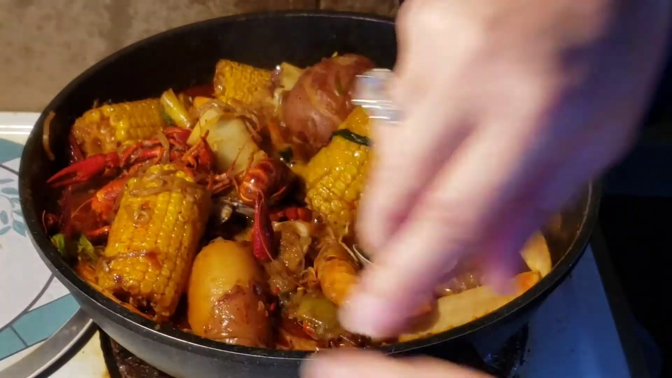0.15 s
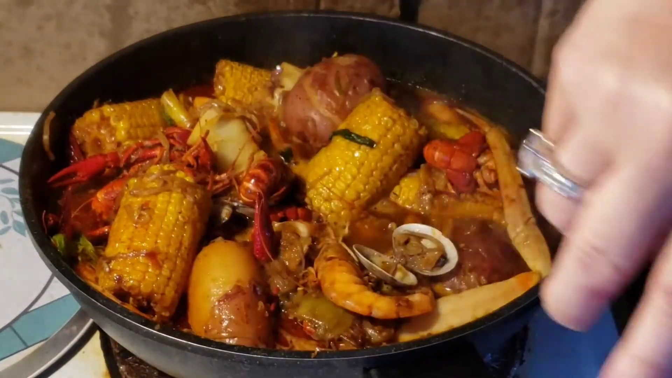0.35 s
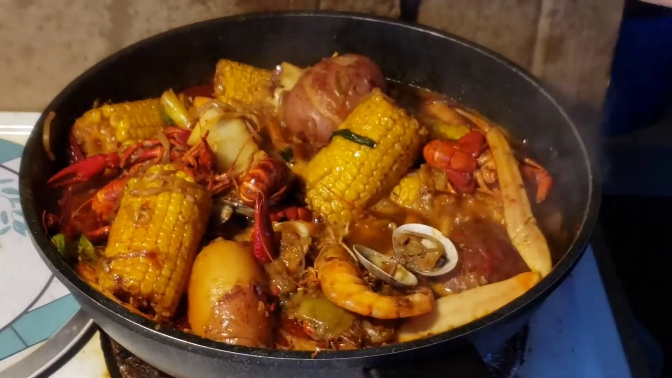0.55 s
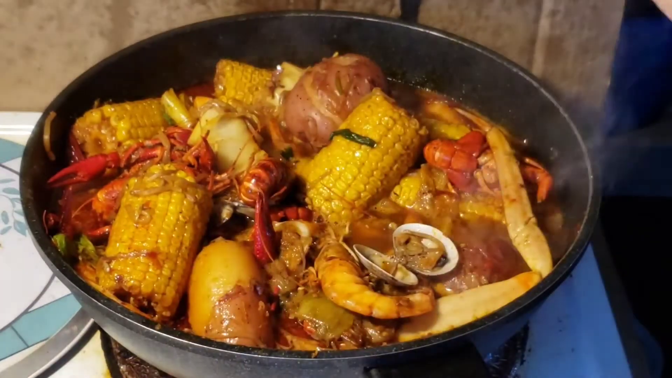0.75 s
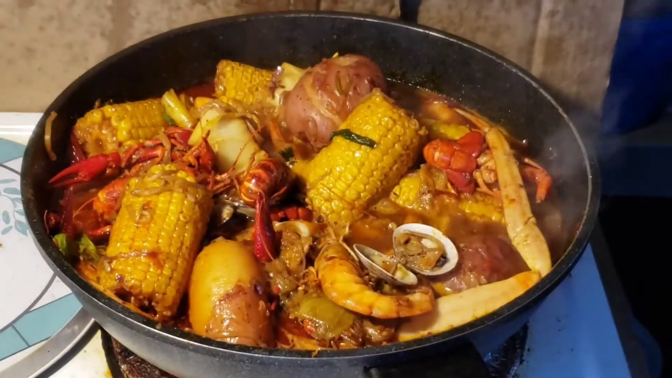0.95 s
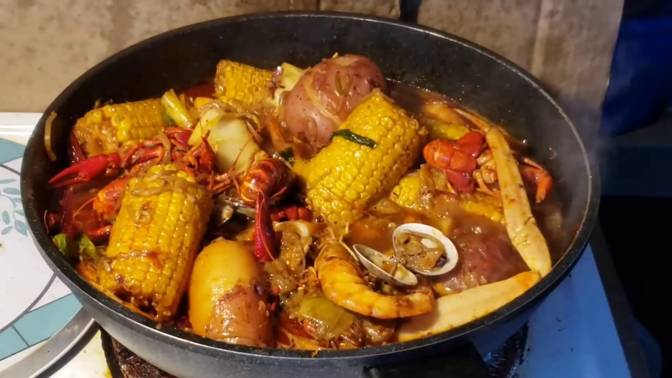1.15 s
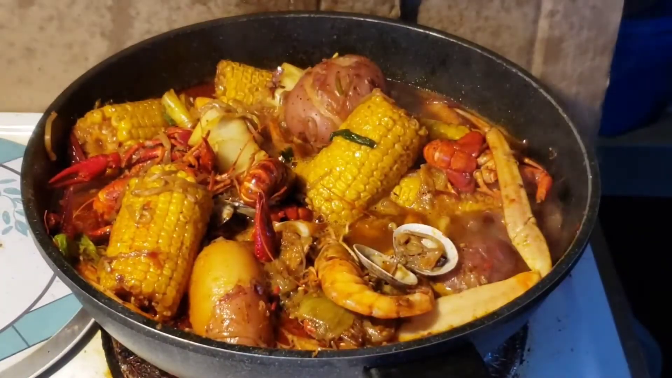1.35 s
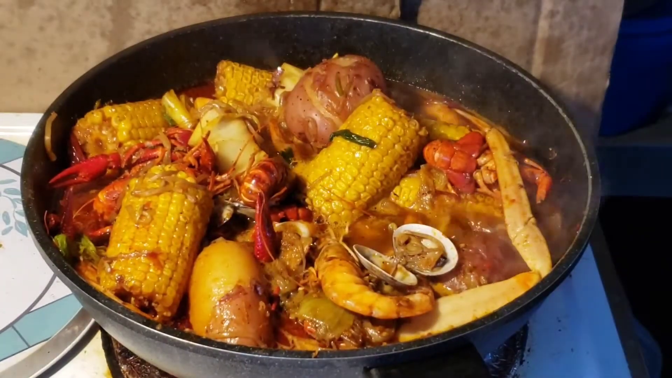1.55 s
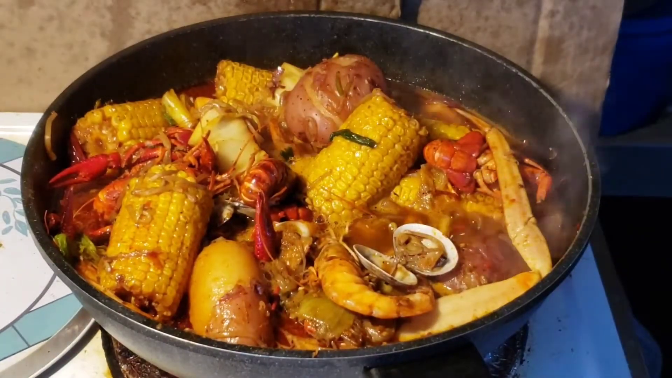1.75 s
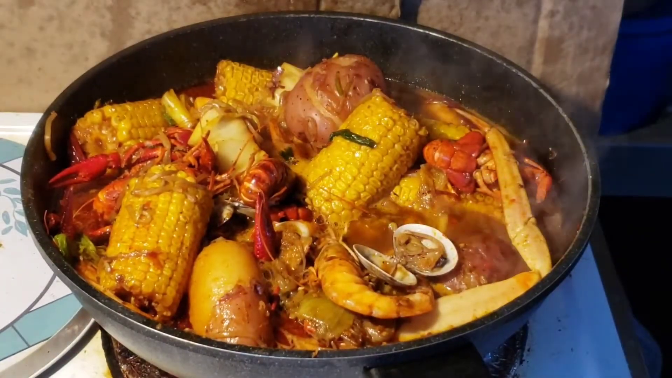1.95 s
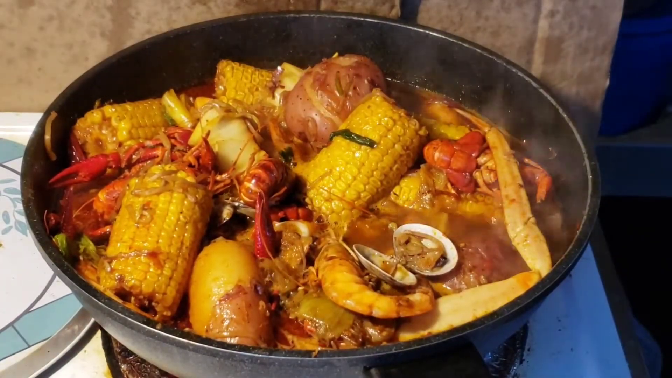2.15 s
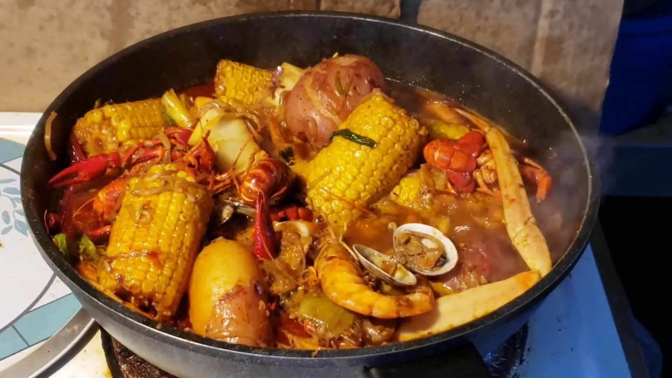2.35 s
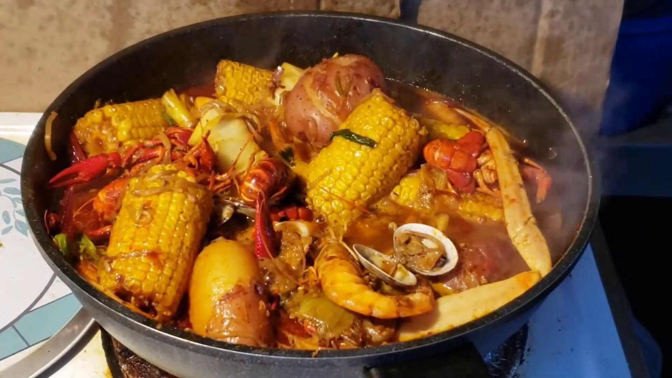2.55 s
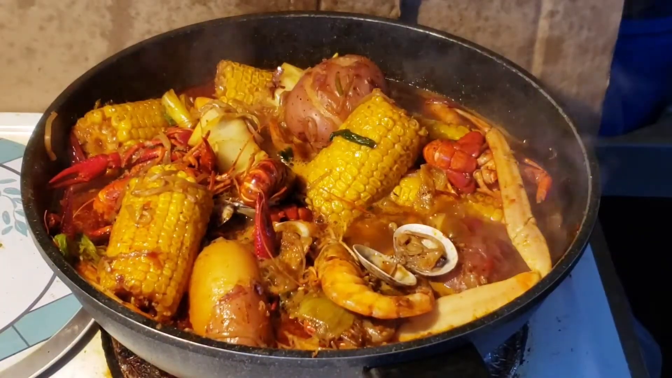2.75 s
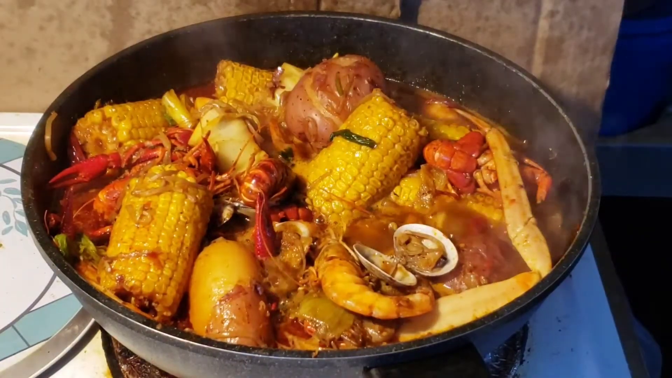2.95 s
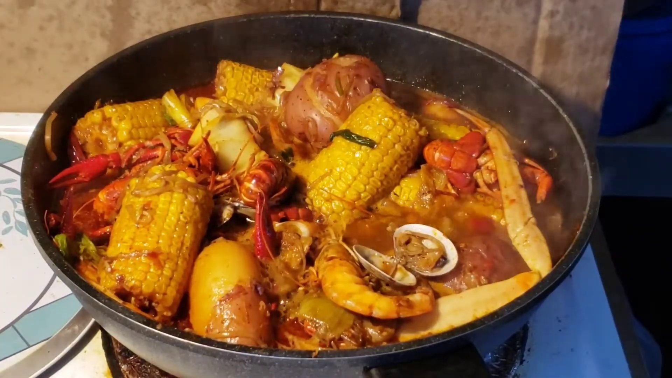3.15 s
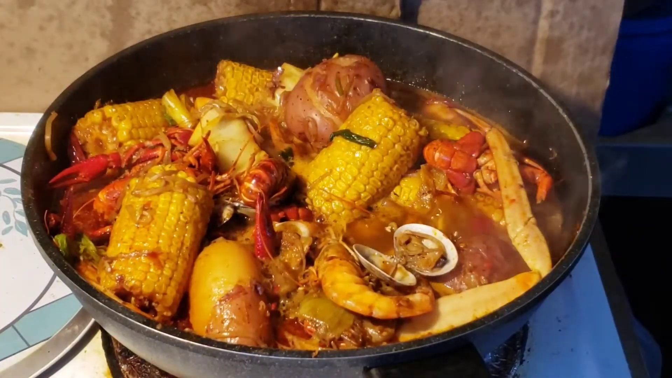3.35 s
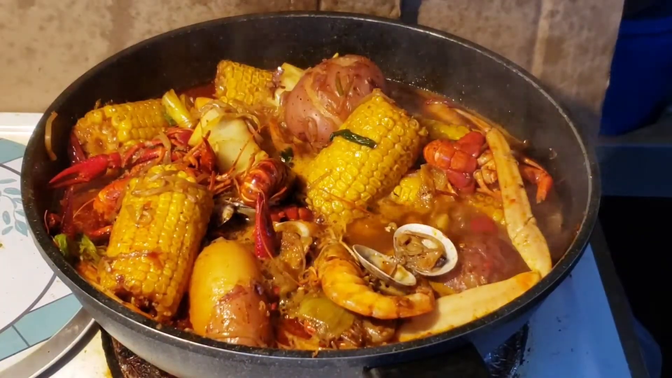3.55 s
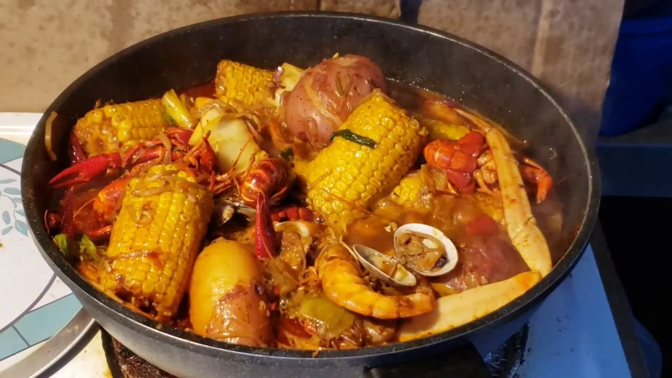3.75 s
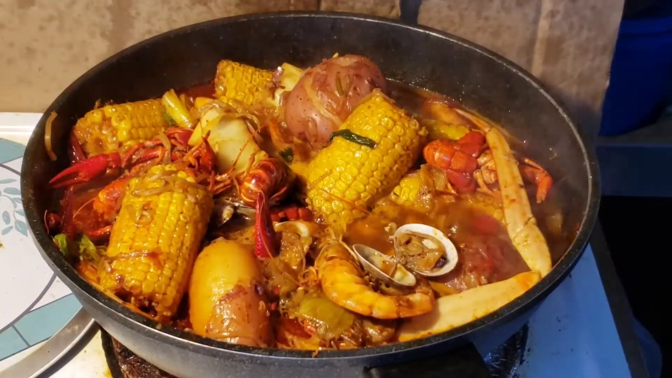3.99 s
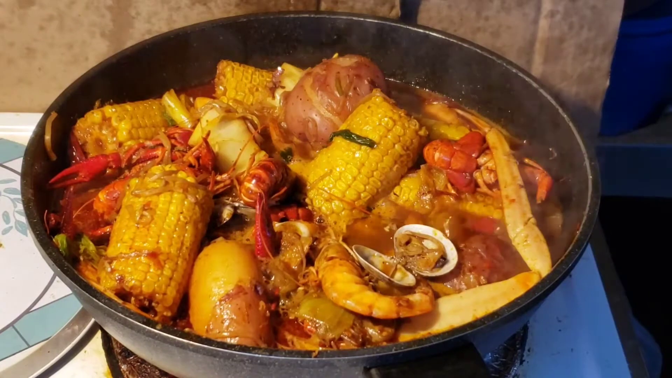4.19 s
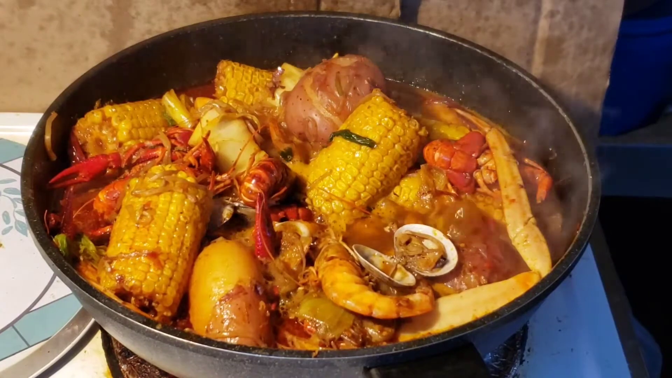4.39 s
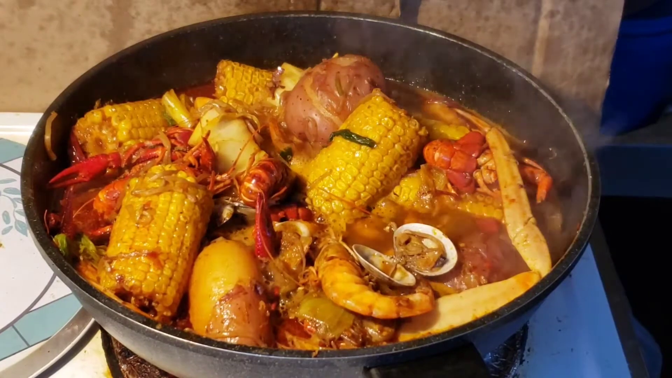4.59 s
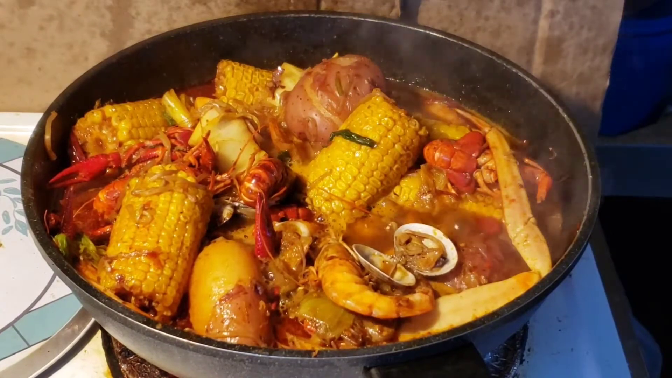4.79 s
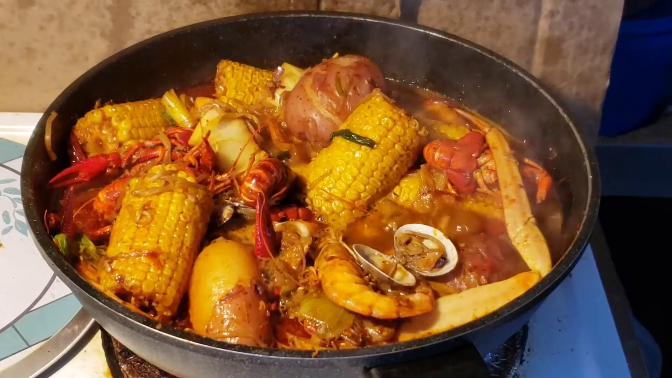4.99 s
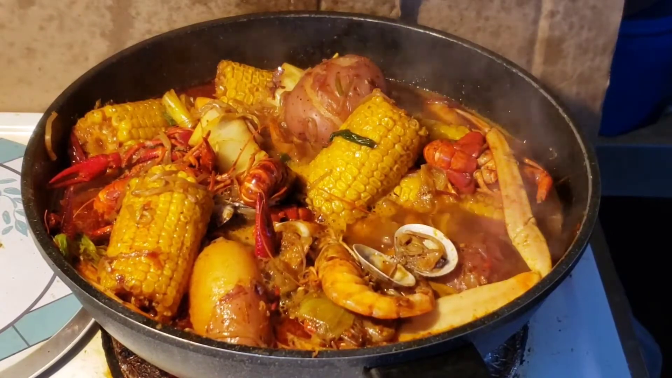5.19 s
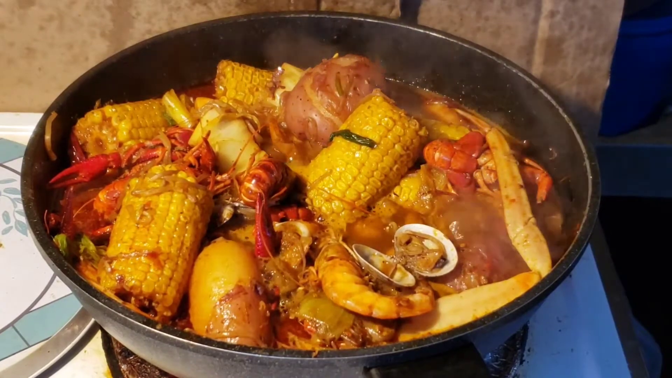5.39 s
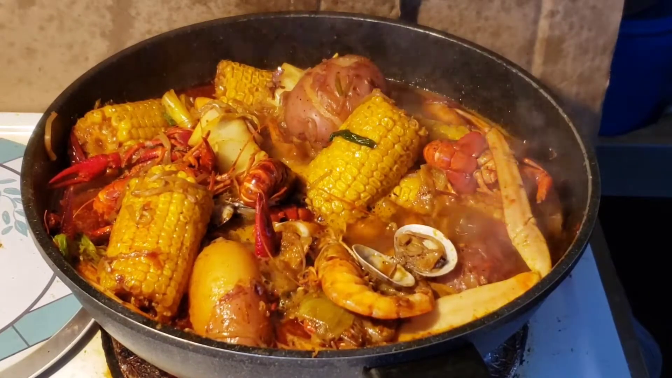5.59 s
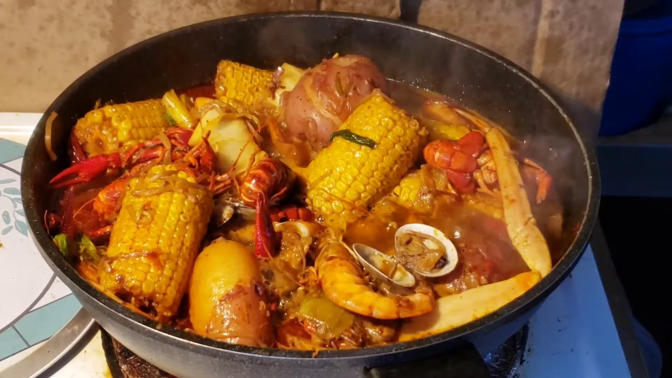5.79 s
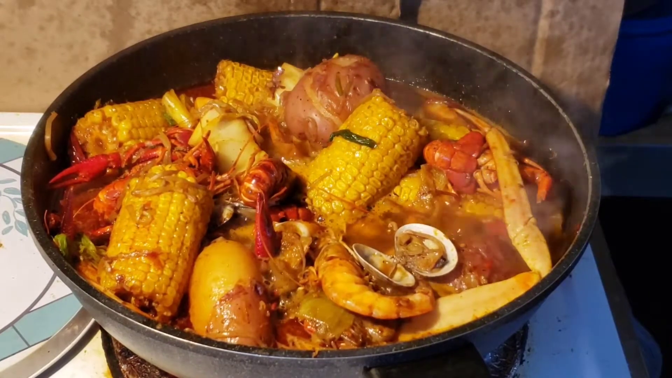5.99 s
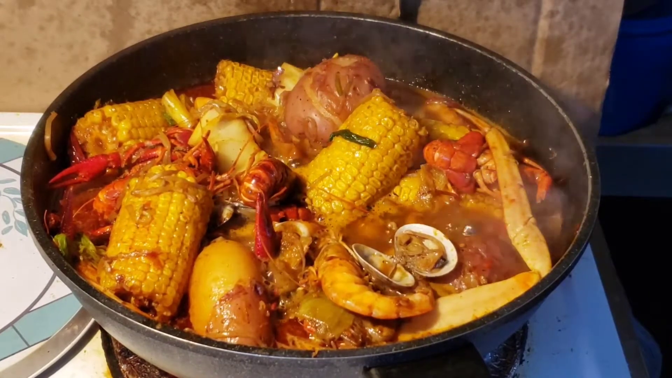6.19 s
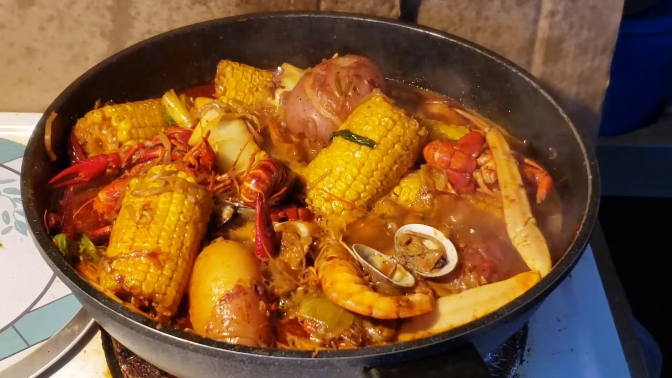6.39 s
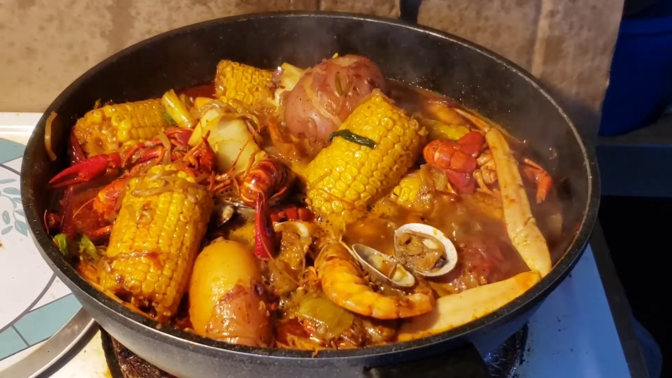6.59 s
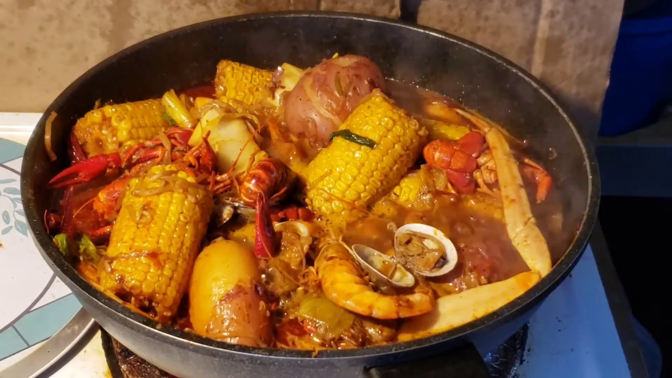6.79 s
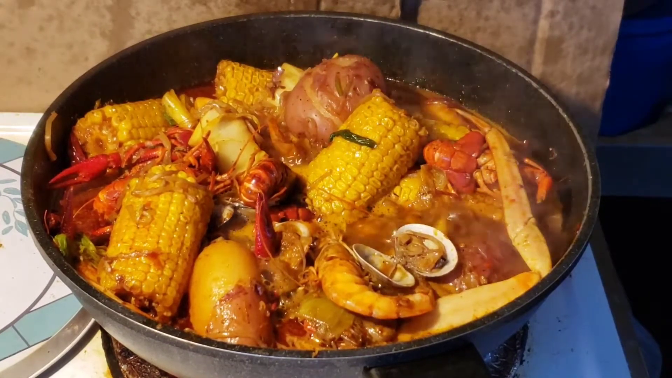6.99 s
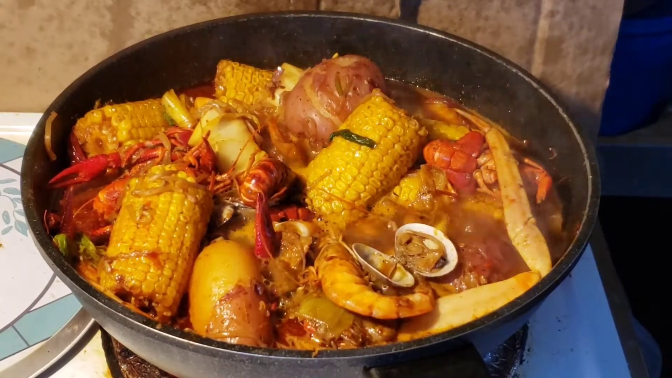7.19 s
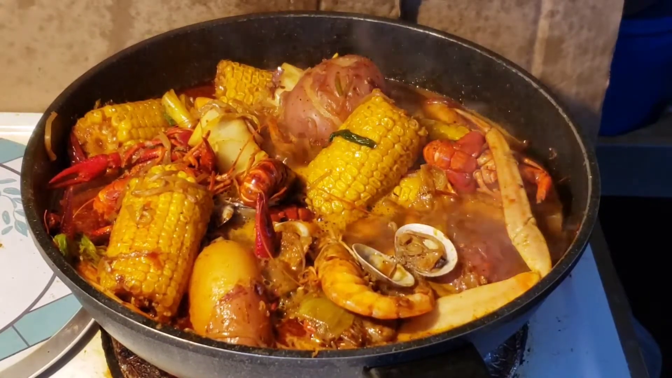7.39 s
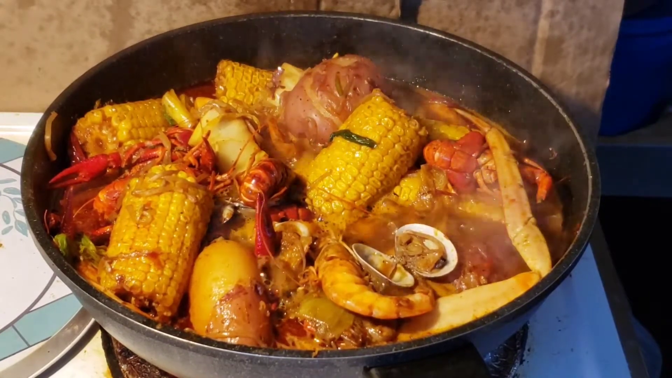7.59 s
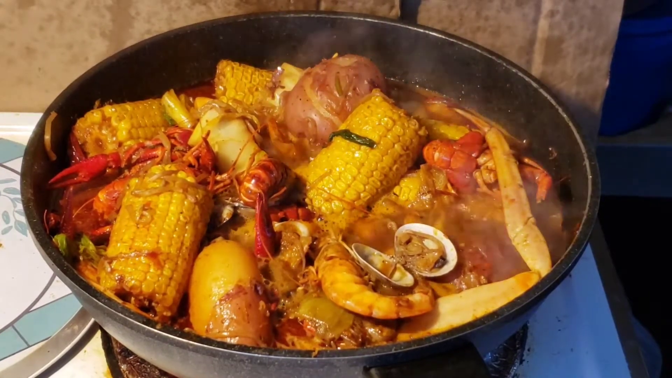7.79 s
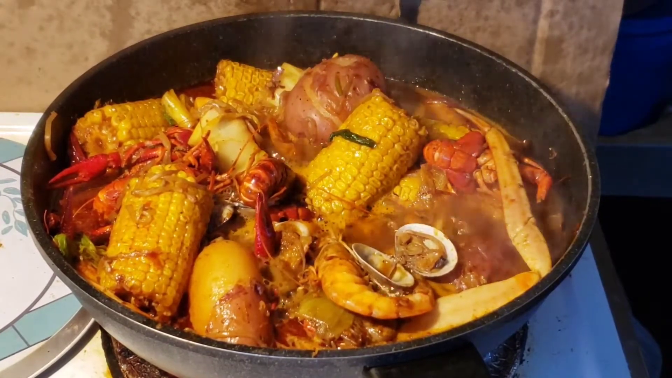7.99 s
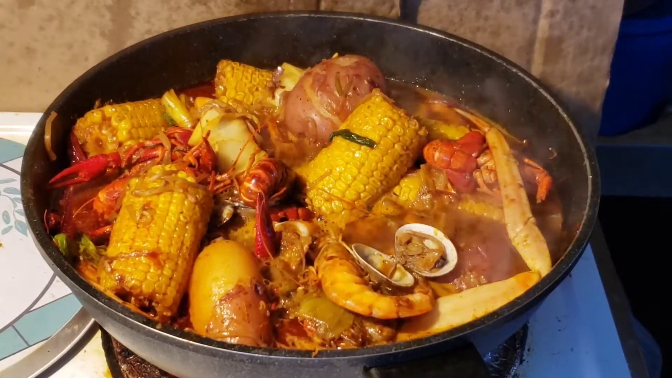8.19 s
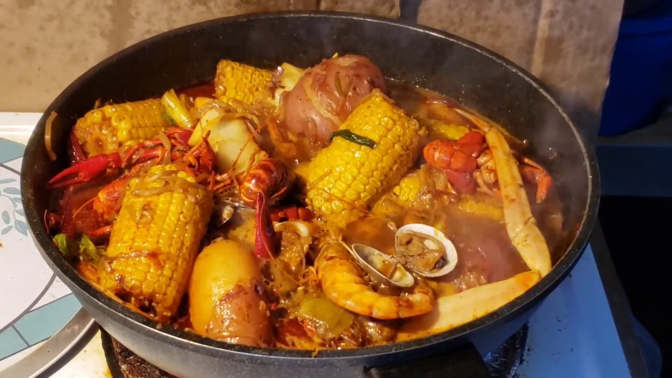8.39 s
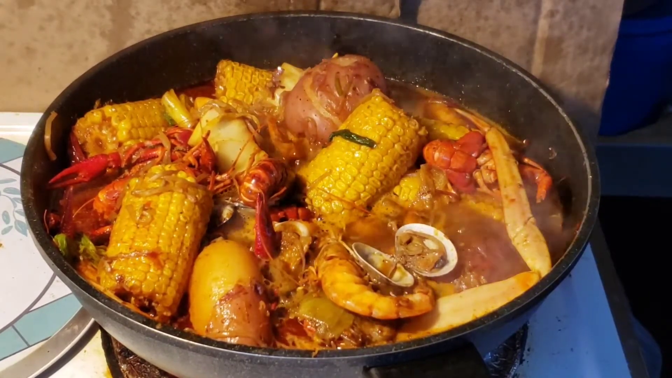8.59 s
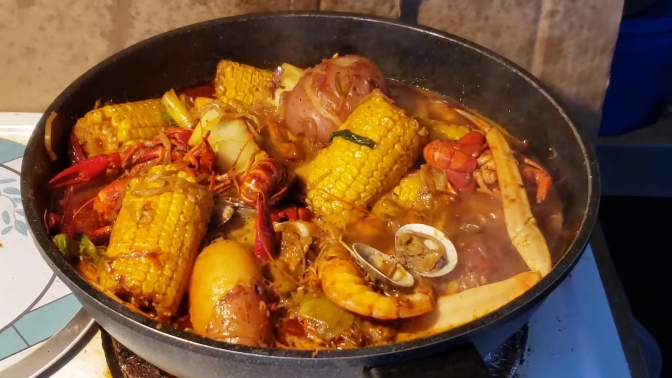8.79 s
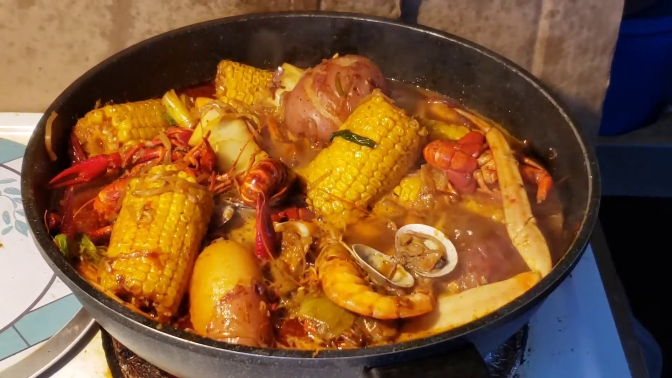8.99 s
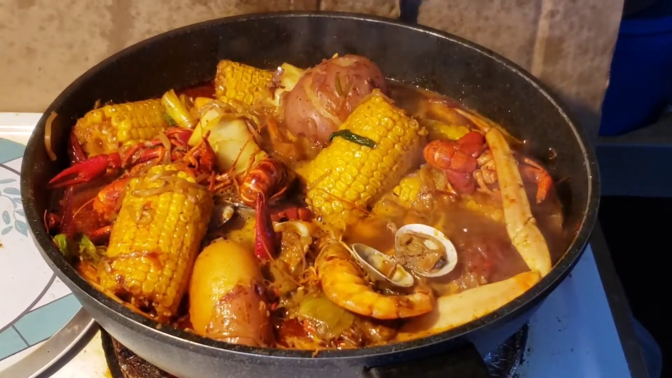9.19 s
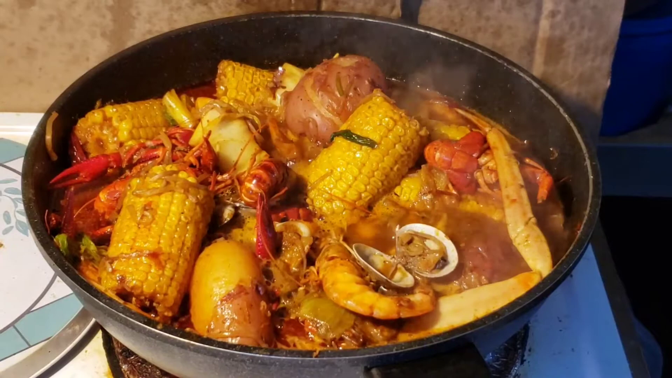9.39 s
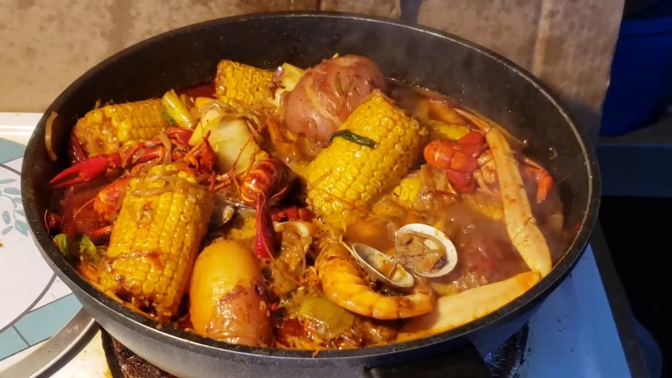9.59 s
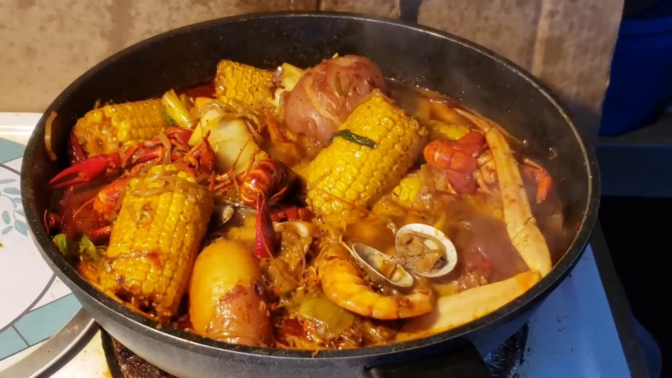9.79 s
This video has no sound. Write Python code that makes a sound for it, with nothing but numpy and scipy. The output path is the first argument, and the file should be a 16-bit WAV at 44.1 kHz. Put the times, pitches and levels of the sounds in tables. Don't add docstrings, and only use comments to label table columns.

```python
import sys
import numpy as np
from scipy import signal
from scipy.fft import rfft, irfft
from scipy.io import wavfile
from scipy.ndimage import uniform_filter1d

SR = 44100
rng = np.random.default_rng(int(sys.argv[2]) if len(sys.argv) > 2 else 0)


def to_wav(sig):
    pcm = np.clip(np.atleast_2d(sig), -1, 1) * 32767
    pcm = np.round(pcm).astype(np.int16)
    wavfile.write(sys.argv[1], SR, pcm.T)


def gain_from_db(level_db):
    decades = np.asarray(level_db, float) / 20
    return 10 ** decades


N = 434385

# time in seconds, gain in dB, vigour in dB.
GAIN_AND_VIGOUR = [(0, -4.5, 6), (.4, -6, 5), (1.07, -5, -1.5), (1.23, -4, 1.5), (1.39, -7, 0),
                   (1.75, -4, 5), (2.33, -3.5, 1.5), (2.91, 0, 3), (3.45, -2, 2), (4.9, -0.5, 5),
                   (6.5, -0.5, 6), (7.96, 0, 7), (8.57, 0.5, 7.5), (9.55, 0, 5.5), (9.85, -0.5, 2.5)]

# frequency in Hz, level in dB per Hz.
AIR_TONE = [(12, -15), (20, -9), (123, -1), (167, -0.5), (352, -3), (431, -13), (700, -17), (823, -6.5),
            (929, -22), (1070, -7), (1210, -16.5), (2500, -48), (3250, -81), (5500, -120)]
# frequency in Hz, likeness (clipped to 0 to 1 after
PORT_LIKENESS = [(60, 0.7), (150, 0.8), (380, 0.88), (950, 0.16), (2380, 0.5), (5980, -0.6), (15000, -12)]
# frequency in Hz, gain in dB.
RIGHT_SHADOW = [(60, -0.5), (200, -3), (380, 1), (700, -2), (1300, -4), (2400, -5.5), (4400, -7),
                (8100, -7.5), (15000, -4.5)]
# frequency in Hz, gain in dB.
MIC_RESPONSE = [(200, -0.5), (2000, 5), (5000, 0), (7300, 0.5), (8600, -8.5), (10500, -4), (13500, -0.5),
                (15500, 3.5)]
MOTOR_HZ, BEAT_S, BEAT_NULL_S = 59.2, 3.75, 3.0
MAINS_HZ, ROTOR_WOBBLE_HZ = 120.5, 5.9

# time in seconds, low shudder in dB, rasp in dB, shudder pitch in Hz.
NUDGE = [(0, -69, -26.5, 275), (.018, -44, -34, 268.5), (.04, -29.5, -35, 265.3), (.07, -38, -35.5, 253),
         (.09, -46.5, -31, 176), (.115, -44, -31, 175), (.135, -45, -33.5, 165), (.15, -57, -27.5, 158),
         (.2, -85, -40.5, 159), (.3, -84, -47.5, 164), (.4, -78, -103, 166)]
# start in seconds, peak in dB, centre in Hz, spray in dB, snap strength.
CATCHES = [
    (0.0524, -27, 5130, -30, .6),
    (.0844, -35, 6780, -42, .6),
    (0.1068, -29, 3580, -23, .6),
    (0.1398, -12, 5400, -4, 0.95),
    (0.2213, -35, 4940, -35, .6),
]
# start in seconds, peak in dB, pitch in Hz, 60 dB decay in seconds, sharpness.
COUNTER_KNOCKS = [
    (1.139, -44.5, 284, 0.026, 5),
    (1.144, -40, 4100, 0.033, 6.0),
    (1.16, -38, 4050, 0.046, 6.5),
    (1.155, -43.5, 2450, .05, 8),
    (1.146, -47, 1950, 0.2, 3.5),
]
# start in seconds, peak in dB, pitch in Hz.
ROCKING_THUDS = [(1.075, -44.5, 76), (2.722, -51, 49.6), (4.42, -43, 185), (5.62, -46, 183),
                 (6.16, -46, 180), (7.68, -44, 177), (7.98, -42, 185), (9.28, -43, 188), (9.62, -45, 190)]

# frequency in Hz, level in dB per Hz.
SIZZLE_TONE = [(900, -48), (1700, -2), (3000, -4), (7000, -3), (9000, -3.5), (12000, -3.5), (16000, -8)]
# crest in seconds, hiss in dB, length in seconds, treble against body in dB.
STEAM_JETS = [(0.28, -59.5, 0.56, -1.5), (1.274, -57.5, 0.48, 0), (1.66, -59, 0.095, 0),
              (1.92, -58.5, 0.12, 1), (2.168, -52.5, 0.065, -7), (2.572, -52, 0.063, -1),
              (3.077, -54, 0.47, 4), (3.637, -55, 0.1, -28), (3.898, -77, 0.32, -20),
              (4.173, -51.5, 0.042, -23), (4.363, -55, 0.053, -16), (4.506, -64, 0.1, -15),
              (4.954, -55.5, 0.14, 1), (5.151, -45, 0.041, -5), (5.23, -53.5, 0.055, 5),
              (5.385, -53, 0.1, 2), (5.67, -48.5, 0.035, -20), (5.9, -53.5, 0.21, -1),
              (6.41, -52, 0.095, -14), (6.693, -53.5, 0.087, -19), (6.812, -52, 0.032, 0),
              (7.14, -50, 0.061, -11), (7.506, -59, 0.77, -17), (7.767, -62, 0.3, -5),
              (8.017, -48, 0.046, -12), (8.387, -51, 0.19, -5), (8.672, -50, 0.11, 2),
              (9.02, -56, 0.25, -21), (9.328, -52.5, 0.097, -29), (9.545, -52.5, 0.35, -5)]
# middle in seconds, depth in dB, length in seconds.
LULLS = [(1.478, 0.5, 0.08), (2.114, 8.5, 0.05), (2.706, 2, 0.15), (3.384, 10.5, 0.13), (4.267, 0.5, .05),
         (5.816, 6.5, .06), (6.3, 2, 0.087), (9.197, 2.5, .04), (9.471, 13, 0.029)]
STEAM_DB, STEAM_FOLLOWS = -61, 0.17
JET_EDGE_DB, JET_RISE = 17, 1
SEEP_TOP_DB, TOP_FLOOR_DB = -0.5, -70

# start in seconds, peak in dB, centre in Hz, spray in dB.
POPS = [(0.538, -42.5, 3600, -43), (2.599, -46, 2620, -65), (3.484, -41.5, 6820, -69),
        (3.95, -34.5, 7560, -50), (4.162, -36, 6030, -65), (4.349, -38.5, 3600, -59),
        (4.4702, -35, 2400, -51), (4.666, -32, 6400, -65), (4.934, -36, 5840, -38),
        (4.964, -38.5, 2770, -41), (5.1128, -39, 6800, -56), (5.1337, -24, 7560, -25.5),
        (5.219, -25.5, 6650, -38), (5.6507, -33, 6140, -36), (5.831, -39, 7700, -46),
        (5.8773, -41, 2390, -54), (6.498, -40.5, 4080, -37.5), (6.696, -34.5, 5670, -62),
        (6.9244, -39, 4040, -50), (7.1356, -31, 4270, -46), (7.149, -24.5, 7000, -34),
        (7.3005, -34.5, 4900, -45), (7.4811, -27.5, 5570, -36), (8.182, -41.5, 4180, -43),
        (8.361, -36, 3060, -42), (8.461, -39, 2500, -38), (8.704, -38, 5200, -37),
        (9.0322, -26.5, 2800, -38), (9.2948, -28.5, 6800, -60), (9.6405, -30.5, 7090, -34)]
# start in seconds, peak in dB, centre in Hz.
SPITS = [(.624, -48, 3980), (2.477, -43, 2690), (3.648, -54, 6800), (3.8202, -44, 3040),
         (3.9205, -46, 2560), (3.9971, -37, 2450), (4.7317, -36.5, 4470), (4.813, -42, 3480),
         (5.039, -37.5, 2900), (5.464, -42, 9000), (5.7025, -34.5, 7900), (5.985, -35.5, 2130),
         (6.6478, -38.5, 5200), (6.9735, -43, 9000), (7.3677, -37.5, 3750), (7.5622, -39, 5310),
         (7.6117, -33.5, 6600), (7.779, -35.5, 5050), (8.0737, -35, 8000), (9.1486, -34, 6940),
         (9.2588, -35.5, 3440), (9.34, -36, 3840), (9.397, -36.5, 3420), (9.4878, -44, 3800),
         (9.5146, -44, 2370)]
# start in seconds, peak in dB, centre in Hz.
FURTHER_SPITS = [(0.3724, -54, 2650), (0.4656, -41, 6840), (0.6875, -54, 2580), (0.711, -45, 5100),
                 (0.7415, -44, 2750), (0.868, -41, 6890), (0.92, -44, 7500), (0.9846, -45.5, 2730),
                 (1.3019, -41, 3840), (1.6511, -43, 3020), (1.9425, -39, 3370), (2.152, -39, 6610),
                 (2.5748, -38, 2750), (2.8689, -34.5, 7400), (4.4505, -54, 2610), (4.5206, -40.5, 3770),
                 (4.8668, -40, 5770), (5.5024, -41, 4260), (5.5695, -38.5, 4670), (6.0631, -41, 2780),
                 (6.2597, -40, 6200), (6.33, -44, 3020), (6.3589, -37, 6810), (6.4233, -35, 4660),
                 (6.6847, -39, 5110), (6.7925, -42, 2580), (6.992, -41, 5870), (7.0764, -49, 6020),
                 (7.107, -45, 2530), (7.9194, -35, 6900), (8.008, -35, 6250), (8.1447, -44, 6850),
                 (8.5959, -45, 4650), (8.6348, -33, 5670), (9.1305, -44, 3800), (9.5357, -33, 3060),
                 (9.5512, -33, 7120), (9.615, -38, 2650), (9.74, -43, 2550)]
TICK_TRIM_DB = -2.5
STRAY_POPS, STRAY_POP_DB, SMALL_SPRAY_DB = 4, -72, -10.5
POP_SNAP, SPIT_SNAP = 1.74, 1.96
POP_T60_S, SPIT_T60_S = 0.067, 0.024
LEAD_DB, LEAD_SPREAD_DB, CATCH_LEAD_DB = 14, 3, 17

# frequency in Hz, width in Hz, gain in dB.
PAN_MODES = [(250, 15, 3.5), (528, 25, 8.5), (847.4, 44, 12), (1069, 83, 8), (1306, 220, 1), (1940, 40, -3)]
# frequency in Hz, level in dB per Hz.
GURGLE_TONE = [(150, -40), (300, 1.5), (520, -2.5), (640, 7.5), (740, -7.5), (1200, -5), (2500, -9.5),
               (5000, -52), (8000, -52)]
# start in seconds, peak in dB, pitch in Hz.
FREE_BUBBLES = [(.606, -45, 1280), (2.398, -40, 1920), (3.125, -38.5, 1420), (3.92, -37, 2240),
                (4.235, -39, 1840), (4.3, -39, 2150), (4.501, -36, 1390), (4.667, -40, 1900),
                (5.008, -43, 640), (5.037, -33, 1890), (5.325, -34.5, 1940), (6.569, -39, 570),
                (8.733, -37, 1130), (8.975, -37, 634), (9.031, -27, 2420), (9.234, -37, 1480),
                (9.334, -36, 1700), (9.381, -37, 1380), (9.525, -39, 1010), (9.598, -29.5, 1920),
                (9.738, -38.5, 1370), (5.078, -38.5, 1070), (5.983, -40.5, 1070), (6.845, -38.5, 1600),
                (7.159, -40.5, 800), (7.486, -38, 1000), (8.999, -34.5, 1200), (9.101, -40, 1070),
                (9.258, -41, 1100), (3.216, -34.5, 556)]
# start in seconds, peak in dB.
WALL_POCKETS = [(.766, -42.5), (1.277, -43), (1.383, -41.5), (1.98, -40), (2.598, -35.5), (3.212, -38),
                (3.825, -38.5), (3.98, -31.5), (4.455, -37), (4.521, -37.5), (4.964, -40), (5.149, -33),
                (5.429, -36.5), (5.613, -39), (5.732, -37), (6.33, -34.5), (6.79, -35.5), (6.898, -32),
                (7.008, -36.5), (7.269, -37), (7.464, -41), (7.98, -40), (8.236, -35), (8.336, -38.5),
                (8.462, -29.5), (8.811, -36), (9.206, -33), (9.28, -38), (9.499, -38.5), (9.834, -37)]
# start in seconds, peak in dB.
DEEP_POCKETS = [(.808, -45.5), (2.166, -40), (2.465, -45), (3.605, -47), (4.744, -38.5), (5.546, -38),
                (5.875, -34.5), (6.516, -46), (7.142, -41), (7.368, -43.5), (7.855, -44), (8.009, -39),
                (8.295, -39), (8.509, -33.5), (8.882, -38)]
# start in seconds, peak in dB, pitch in Hz.
SMALL_POCKETS = [(0.3945, -46, 1100), (0.6606, -50, 1080), (1.013, -48, 1070), (1.06, -42.5, 1040),
                 (2.104, -44, 1650), (2.5007, -42, 1080), (2.6443, -41, 1070), (3.3313, -42, 1870),
                 (3.5927, -52, 1040), (3.611, -39, 1360), (3.6503, -45, 1130), (3.8437, -37, 1940),
                 (4.117, -37, 2200), (4.157, -44, 1040), (4.4894, -36, 1080), (4.6074, -42, 1070),
                 (4.811, -44, 1050), (5.2986, -48, 1040), (5.357, -42, 1050), (5.937, -45, 1100),
                 (6.3906, -43, 1050), (6.4667, -42.5, 1080), (6.5968, -44, 1070), (6.8743, -56, 1650),
                 (6.8868, -40, 1105), (7.0503, -45, 1070), (7.4236, -40.5, 1020), (7.612, -51, 1130),
                 (8.078, -42, 1060), (8.569, -41, 1060), (8.6475, -37, 1440), (8.671, -37, 1020),
                 (9.4745, -42, 1100), (9.6899, -41.5, 1070)]
# start in seconds, peak in dB, pitch in Hz.
PLOPS = [(1.277, -51, 528), (2.532, -41.5, 501), (2.664, -42.5, 353), (2.725, -40.5, 405),
         (2.822, -45, 370), (3.644, -46.5, 540), (3.699, -46, 530), (4.259, -49, 584), (4.351, -42, 533),
         (4.71, -59, 536), (4.883, -41, 533), (4.966, -40, 522), (5.154, -40, 515), (5.295, -55, 353),
         (5.436, -43, 520), (5.631, -36.5, 600), (5.732, -40, 530), (5.875, -55, 630), (6.175, -38, 528),
         (6.898, -42, 528), (7.055, -49, 590), (7.156, -43, 584), (7.285, -50, 604), (7.433, -43, 584),
         (7.857, -43, 522), (7.978, -43, 619), (8.271, -52, 538), (8.409, -50, 390), (8.809, -45, 522),
         (8.86, -38, 345), (8.921, -55, 361), (9.119, -42, 517), (9.205, -50, 522), (9.274, -39, 363),
         (9.502, -46, 544), (9.699, -41, 630)]
WALL_HZ, DEEP_HZ, SIZE_SPREAD = 1070, 820, 0.011
SMALL_TRIM_DB, PLOP_TRIM_DB = -2, -2.5
AIR_DB, GURGLE_DB = -55.5, -56.5
CHURN_S, CHURN_SHARE = 0.033, 0.33


def rms_one(x):
    return x / np.sqrt(np.mean(x ** 2) + 1e-20)


def in_time(rows):
    s, *columns = np.transpose(rows)
    return [np.interp(np.arange(N) / SR, s, c) for c in columns]


def at_hz(points, hz):
    table_hz, values = np.transpose(points)
    return np.interp(np.log(hz + 1), np.log(table_hz), values)


def coloured(x, points):
    hz = np.fft.rfftfreq(N, 1 / SR)
    return irfft(rfft(x) * gain_from_db(at_hz(points, hz)), N)


def drift(rate):
    r = np.exp(-80 * np.pi * rate / SR)
    slow = signal.lfilter([1], [1, -2 * r, r * r], rng.standard_normal(N // 40 + 2002))[2000:]
    return np.interp(np.arange(N) / 40, np.arange(len(slow)), rms_one(slow))


def resonance(x, hz, width_hz):
    r = np.exp(-np.pi * width_hz / SR)
    poles = [1, -2 * r * np.cos(2 * np.pi * hz / SR), r * r]
    return signal.lfilter([(1 - r * r) / 2, 0, (r * r - 1) / 2], poles, x)


def stereo_noise(points):
    hz = np.fft.rfftfreq(N, 1 / SR)
    alike = np.clip(at_hz(PORT_LIKENESS, hz), 0, 1)
    mid, side = rfft(rng.standard_normal((2, N))) * gain_from_db(at_hz(points, hz))
    return rms_one(irfft(np.sqrt(1 + alike) * mid + np.sqrt(1 - alike) * side * [[1], [-1]], N))


def grains(per_s, spread_db, low_hz, high_hz, cycles):
    sizes = gain_from_db(spread_db * np.minimum(rng.exponential(1, N), 4)) * rng.choice([-1, 1], N)
    clicks = sizes * (rng.random(N) < per_s / SR) + 1e-18
    dealt = rng.integers(0, 16, N)
    pitches = np.geomspace(low_hz, high_hz, num=16)
    return rms_one(sum(resonance(clicks * (dealt == k), hz, 3.95 * hz / cycles)
                       for k, hz in enumerate(pitches)))


def add_burst(out, s, peak_db, hz, t60, sharpness, rise_s, spike):
    t = np.arange(4096) / SR
    splutter = rng.standard_normal((2, 4096)) * gain_from_db(4 * np.repeat(rng.standard_normal(64), 64))
    splutter[1] = 0.46 * splutter[0] + 1.03 * splutter[1]
    shape = gain_from_db(-60 * t / t60) * np.minimum(t / rise_s, 1) + spike * spike * np.exp(-t / 0.00026)
    burst = resonance(splutter * shape, hz, hz / sharpness)
    burst = resonance(burst, hz, 1.3 * hz / sharpness)
    burst *= gain_from_db(peak_db) / np.abs(burst).max(axis=1, keepdims=True)
    at = round(s * SR)
    out[:, at:at + 4096] += burst[:, :N - at]


def cracks(rows, trim_db, sharpness):
    out, t = np.zeros(N + 512), np.arange(512) / SR
    for s, peak_db, hz, *_ in rows:
        at = round(s * SR)
        click = np.sin(2 * np.pi * hz * t) * np.exp(-np.pi * hz * t / sharpness)
        out[at:at + 512] += gain_from_db(peak_db + trim_db) * click
    return out[:N]


def kitchen(x, t60, wet_db, low_hz):
    t = np.arange(16384) / SR
    tail = rng.standard_normal((2, 16384)) * gain_from_db(-60 * t / t60) * (t > .002)
    tail *= gain_from_db(wet_db) / np.sqrt(np.sum(tail ** 2, axis=1, keepdims=True))
    tail = signal.sosfilt(signal.butter(2, low_hz, "high", fs=SR, output="sos"), tail)
    return x + signal.fftconvolve(x, tail, axes=1)[:, :N]


def hum():
    t = np.arange(N) / SR
    beat = np.sin(np.pi * (t - BEAT_NULL_S) / BEAT_S)
    motors = beat * np.sin(2 * np.pi * MOTOR_HZ * t) + 0.13 * np.cos(2 * np.pi * MOTOR_HZ * t)
    wobble = 1 + 0.19 * np.sin(2 * np.pi * ROTOR_WOBBLE_HZ * t)
    mains = wobble * np.sin(2 * np.pi * MAINS_HZ * t + 0.5 * drift(3.9))
    fan = gain_from_db(1.6 * drift(4.1)) * np.sin(2 * np.pi * 253.5 * t + 0.29 * drift(1.1))
    return gain_from_db(8) * motors + gain_from_db(5.0) * mains + gain_from_db(-4.5) * fan


def pan_body(x):
    return 0.8 * x + sum(gain_from_db(db) * resonance(x, hz, width) for hz, width, db in PAN_MODES)


def nudge():
    low_db, rasp_db, hz = in_time(NUDGE)
    turn = 2 * np.pi * np.cumsum(hz * (1 + 0.055 * drift(80))) / SR
    shudder = np.sin(turn) + 0.21 * np.sin(2 * turn + 1)
    rasp = stereo_noise([(250, -3.5), (500, -4.5), (900, -12.0), (4000, -3.0), (16000, -5)])
    rasp = rasp * gain_from_db(2.5 * drift(70))
    moving = np.clip((.45 - np.arange(N) / SR) / 0.043, 0, 1)
    scrape = gain_from_db(rasp_db + 0.5) * (0.46 * rasp + 0.43 * pan_body(rasp))
    return moving * (gain_from_db(low_db + 1.5) * shudder + scrape)


def puffs(per_s, spread_db, length_s):
    opened = gain_from_db(spread_db * np.minimum(rng.exponential(1, N), 3)) * (rng.random(N) < per_s / SR)
    closing, opening = np.exp(-1 / (length_s * SR)), np.exp(-1 / (0.00043 * SR))
    gain = signal.lfilter([1], [1, -closing], opened + 1e-18)
    return rms_one(signal.lfilter([1], [1, -opening], gain))


def jet_gains(seep_db):
    t = np.arange(0, N + 64, 64) / SR

    def total(rows):
        return np.interp(np.arange(N) / SR, t, rows.sum(axis=0))

    s, db, length, top_db = np.transpose(STEAM_JETS)[:, :, None]
    from_crest = np.maximum((s - t) / JET_RISE, t - s) / length
    swell = gain_from_db(2 * (db - JET_EDGE_DB * from_crest))
    s, depth_db, length = np.transpose(LULLS)[:, :, None]
    covered = gain_from_db(-total(depth_db * np.exp(-((t - s) / length) ** 2)))
    body = total(swell) + gain_from_db(2 * seep_db)
    top = total(swell * gain_from_db(2 * top_db)) + gain_from_db(2 * (seep_db + SEEP_TOP_DB))
    return covered * np.sqrt(body), np.sqrt(covered ** 2 * top + gain_from_db(2 * TOP_FLOOR_DB))


def steam(gain_db, vigour_db):
    body_gain, top_gain = jet_gains(STEAM_DB + gain_db + STEAM_FOLLOWS * vigour_db)
    crackle = coloured(grains(300, 2.6, 2730, 15500, cycles=44.0), SIZZLE_TONE)
    hiss = stereo_noise(SIZZLE_TONE) + gain_from_db(-8.5) * rms_one(crackle)
    body = signal.sosfilt(signal.butter(4, 8400, fs=SR, output="sos"), hiss)
    top = signal.sosfilt(signal.butter(4, 8400, "high", fs=SR, output="sos"), hiss)
    vents = 0.44 * puffs(27, 6.8, 0.0074)
    out = body_gain * rms_one(body) * (1 + vents + 0.23 * puffs(40, 0.63, 0.0043))
    out += top_gain * rms_one(top) * (1 + vents + 0.27 * puffs(27, 3.0, 0.0012))
    return gain_from_db(-1.5) * out


def all_pops(vigour_db):
    small = SPITS + [(s, db + TICK_TRIM_DB, hz) for s, db, hz in FURTHER_SPITS]
    for when, size, pitch in rng.random((STRAY_POPS, 3)):
        at = int((.1 + .89 * when) * N)
        small.append((at / SR, STRAY_POP_DB + vigour_db[at] + 4 * size, 2400 * 3.0 ** pitch))
    rows = [(*row, POP_SNAP) for row in POPS]
    rows += [(s, db, hz, db + SMALL_SPRAY_DB, SPIT_SNAP) for s, db, hz in small]
    leads = LEAD_DB + LEAD_SPREAD_DB * rng.standard_normal(len(rows))
    return [(*row, lead) for row, lead in zip(rows, leads)] + [(*row, CATCH_LEAD_DB) for row in CATCHES]


def popping(vigour_db):
    bursts = all_pops(vigour_db)
    out = cracks(bursts, trim_db=6.5, sharpness=.8) * gain_from_db([[0], [-4.5]])
    for s, peak_db, hz, spray_db, snap, lead_db in bursts:
        ports_db = np.array([[0], [11.5 - lead_db]])
        t60 = SPIT_T60_S if snap == SPIT_SNAP else POP_T60_S
        add_burst(out, s, peak_db + 3.0 + ports_db, hz, t60, sharpness=1.4, rise_s=0.00051, spike=snap)
        add_burst(out, s, spray_db + 8 + ports_db, 12300, .028, sharpness=1.0, rise_s=.0004, spike=snap)
    return out


def pockets():
    sung = [(s, db, WALL_HZ) for s, db in WALL_POCKETS] + [(s, db, DEEP_HZ) for s, db in DEEP_POCKETS]
    sizes = 1 + SIZE_SPREAD * rng.standard_normal(len(sung))
    sung = [(s, db, hz * size) for (s, db, hz), size in zip(sung, sizes)]
    small = [(s, db + SMALL_TRIM_DB, hz) for s, db, hz in SMALL_POCKETS]
    plops = [(s, db + PLOP_TRIM_DB, hz) for s, db, hz in PLOPS]
    return sung + FREE_BUBBLES + small + plops


def blips(rows, cycles, glide, rise_s):
    out, t = np.zeros(N), np.arange(4096) / SR
    slides = glide * rng.uniform(-0.67, 0.95, len(rows))
    for (s, peak_db, hz), slide in zip(rows, slides):
        decay = gain_from_db(peak_db - 60 * t * hz / cycles)
        blip = np.sin(2 * np.pi * hz * (t + slide * t * t)) * decay * np.minimum(t / rise_s, 1)
        at = round(s * SR)
        out[at:at + 4096] += blip[:N - at]
    return out


def churn(big):
    marks = np.zeros(N)
    for s, peak_db, _ in big:
        marks[round(s * SR)] += gain_from_db(0.6 * peak_db)
    width = round(CHURN_S * SR)
    crowd = uniform_filter1d(uniform_filter1d(marks, size=width), size=width)
    return rms_one(1 - CHURN_SHARE + CHURN_SHARE * rms_one(np.maximum(crowd, 0)))


def gurgling(gain_db, vigour_db):
    clumps = gain_from_db(1.5 * drift(15))
    bed = clumps * grains(600 * clumps, 2.64, 297, 3750, cycles=18.0)
    bed = rms_one(pan_body(coloured(bed, GURGLE_TONE)))
    bed *= gain_from_db(GURGLE_DB + gain_db + vigour_db - 5.5)
    splash, knocks = np.zeros((2, 2, N))
    big = pockets()
    for s, peak_db, hz in big:
        add_burst(splash, s, peak_db, hz, .035, sharpness=0.82, rise_s=0.0043, spike=1.34)
    for s, peak_db, hz, t60, sharpness in COUNTER_KNOCKS:
        add_burst(knocks, s, peak_db, hz, t60, sharpness, rise_s=0.0021, spike=0)
    tear = cracks(big, trim_db=-8.0, sharpness=0.66)
    ringing = gain_from_db(-6.5) * pan_body(splash + cracks(big, trim_db=0.0, sharpness=0.58))
    singing = gain_from_db(-7.0) * blips(big, cycles=32.8, glide=5.8, rise_s=0.0011)
    rocking = blips(ROCKING_THUDS, cycles=24.0, glide=.3, rise_s=.012)
    return churn(big) * bed + tear + ringing + knocks + (singing + rocking)


def scene():
    gain_db, vigour_db = in_time(GAIN_AND_VIGOUR)
    pan = kitchen(gurgling(gain_db, vigour_db), t60=0.068, wet_db=-2.0, low_hz=760)
    rim = steam(gain_db, vigour_db) + popping(vigour_db) + nudge()
    rim = kitchen(rim, t60=0.093, wet_db=-8, low_hz=400)
    air = gain_from_db(AIR_DB + gain_db) * (hum() + gain_from_db(2.0) * stereo_noise(AIR_TONE))
    left, right = pan + rim + air
    return np.array([left, coloured(np.roll(right, 2), RIGHT_SHADOW)])


def top_cut(x):
    return signal.sosfilt(signal.butter(12, 16970, fs=SR, output="sos"), x)


def record(dry):
    rounded = 1.05 * np.tanh(coloured(dry, MIC_RESPONSE) / 1.05)
    limited = signal.sosfilt(signal.cheby2(12, 42, 16050, fs=SR, output="sos"), rounded)
    return top_cut(limited)


dry = scene()
out = record(dry)
to_wav(out)
```